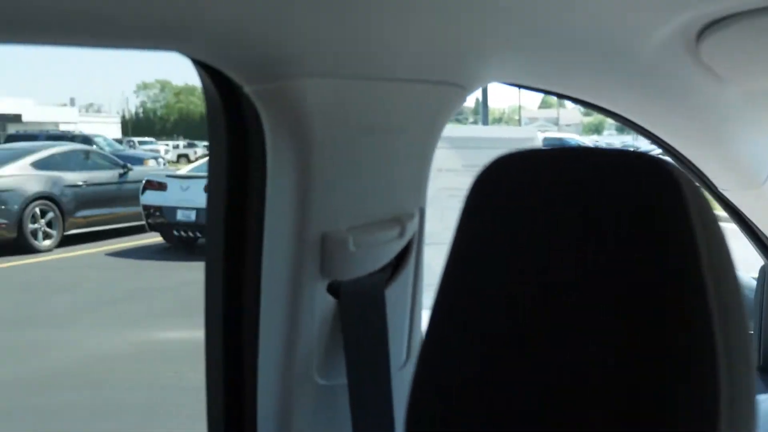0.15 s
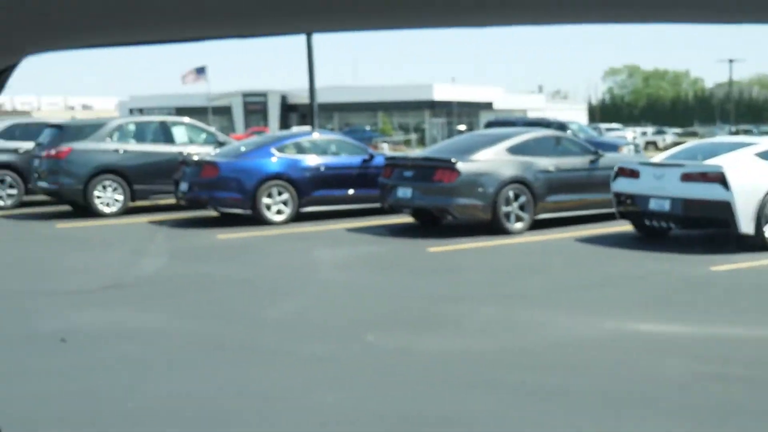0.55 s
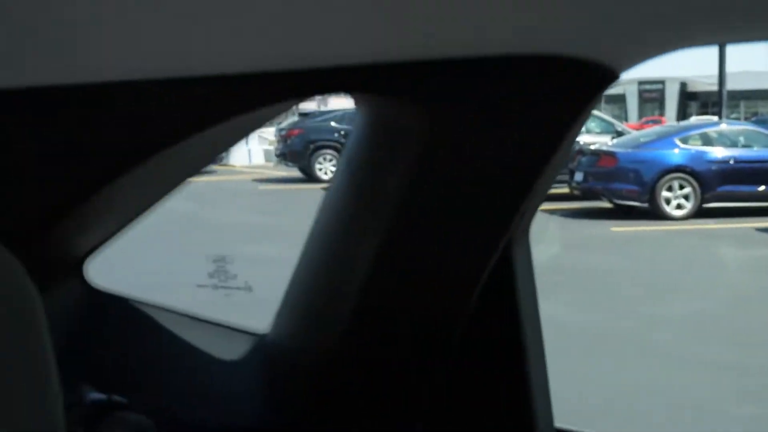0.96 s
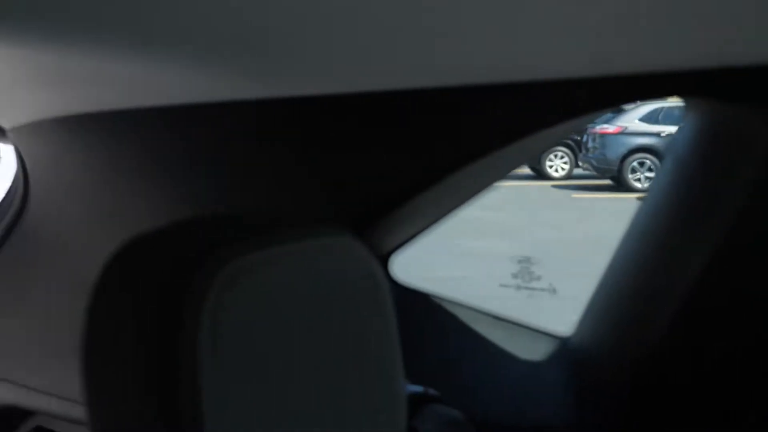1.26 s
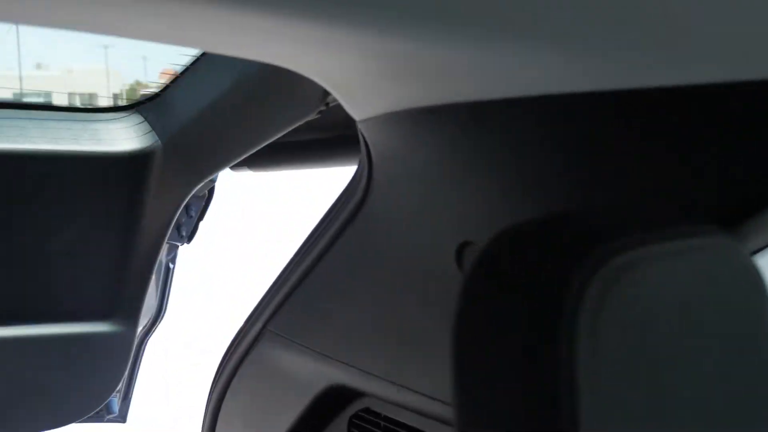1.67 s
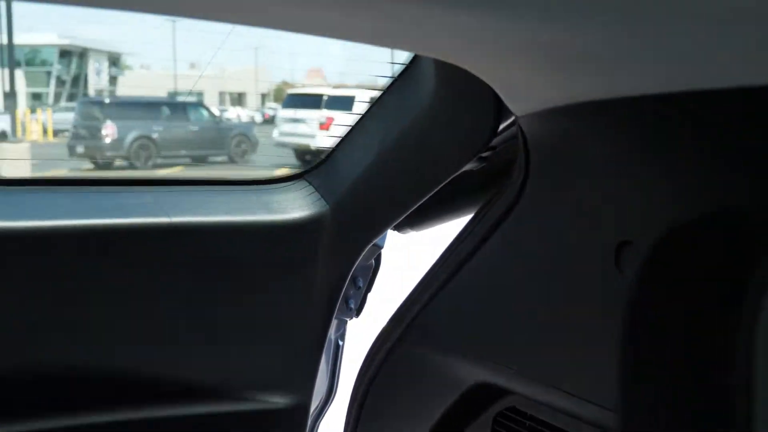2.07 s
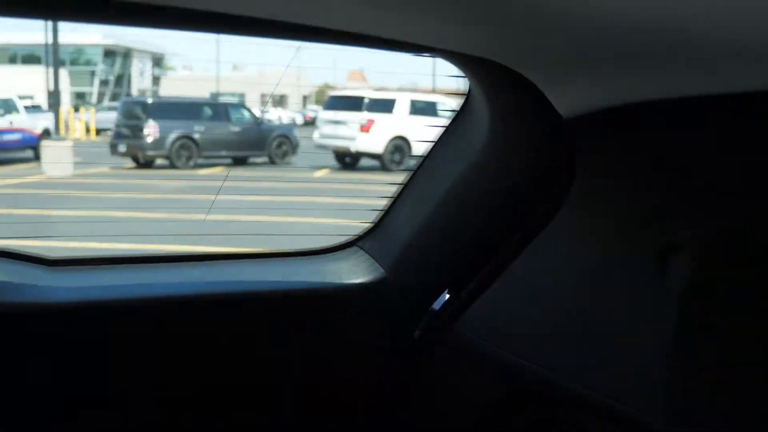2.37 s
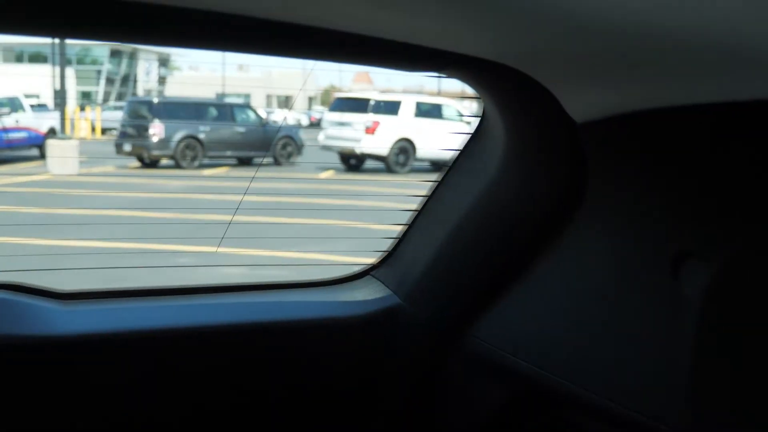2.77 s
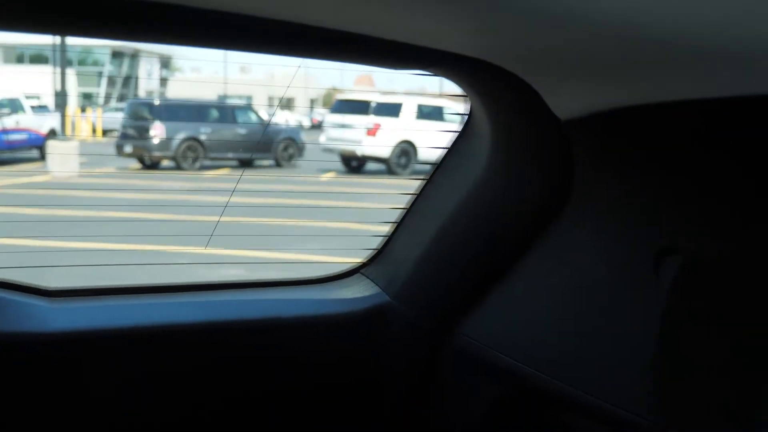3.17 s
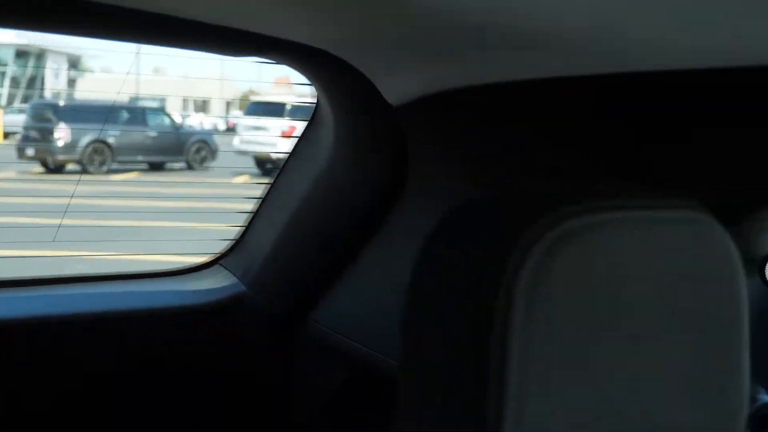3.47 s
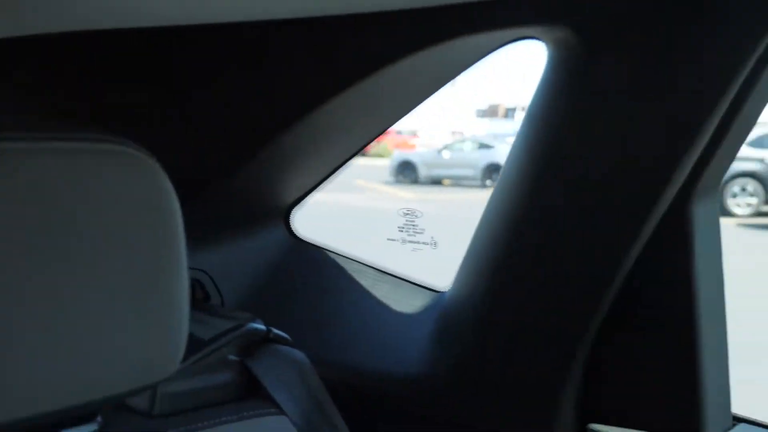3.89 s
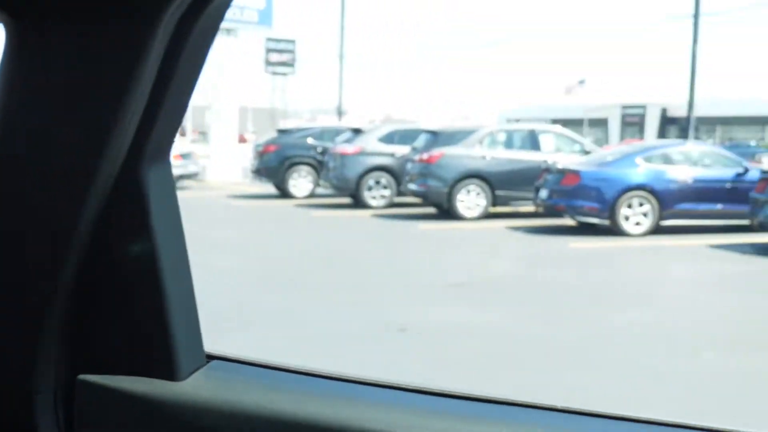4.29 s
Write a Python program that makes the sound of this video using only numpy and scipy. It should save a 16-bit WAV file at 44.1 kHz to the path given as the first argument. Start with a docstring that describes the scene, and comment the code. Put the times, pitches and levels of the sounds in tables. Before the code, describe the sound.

From inside a parked, idling car, a low engine throb and outdoor rumble sit under a wavering electric hum as the liftgate lowers. It shuts with a scraping crack and a huge, overloaded thump, dull knocks and boom following. The cabin goes quieter, a motor whines and rattles the latch tight, then stops, leaving a bright click and tiny trim ticks.

```python
"""Inside a parked, idling car a power liftgate hums down and shuts with a crack and a heavy thump.
The squeezed cabin air overloads the microphone; struck modes make the crack, knocks, thuds and clicks.
A motor tone and gear noise ring panels as the gate lowers; whining gears then cinch the rattling latch.
Engine orders throb under coloured noise for air, outdoors, rubber seal and upholstery.
The shut cabin is quieter, with one bright click and a few small ticks of trim."""
import sys
import numpy as np
from scipy import signal
from scipy.fft import rfft, irfft, next_fast_len
from scipy.io import wavfile
from scipy.ndimage import uniform_filter1d

SR = 44100
rng = np.random.default_rng(int(sys.argv[2]) if len(sys.argv) > 2 else 0)


def wav_out(sig):
    """Save sig, one row per channel (or a flat mono array), as 16-bit PCM at SR to the path in sys.argv[1]."""
    wavfile.write(sys.argv[1], SR, np.round(np.clip(np.atleast_2d(sig).T, -1, 1) * 32767).astype(np.int16))


N = 195848
T = np.arange(N) / SR
FREQS = np.maximum(np.fft.rfftfreq(next_fast_len(N, True), 1 / SR), 1)


def undb(db):
    """Amplitude gain is ten to the power of decibels over twenty."""
    return 10 ** (np.asarray(db) / 20)


def level(x, db):
    """Root-mean-square level: scale steady sound to it."""
    return x * undb(db) / np.sqrt(np.mean(x ** 2))


def burst_level(x, db):
    """Burst energy: scale a short sound to its rms level referred to 25 ms."""
    return x * undb(db) / np.sqrt(np.sum(x ** 2) / (SR / 40))


def walk(rate):
    """Low-passed noise: held random values, smoothed twice, wander with a spread near 1."""
    k = int(SR / rate)
    steps = rng.standard_normal(2000)[np.arange(N) // k]
    return 1.3 * uniform_filter1d(uniform_filter1d(steps, k), k)


def coloured(points):
    """Spectral shaping: white noise weighted through (Hz, dB) points on a log frequency axis."""
    hz, db = np.transpose(points)
    white = rfft(rng.standard_normal(next_fast_len(N, True)))
    return irfft(white * undb(np.interp(np.log(FREQS), np.log(hz), db)))[:N]


def ring(x, modes):
    """Modal superposition: sum of steep, twice-filtered resonances (Hz, width Hz, dB)."""
    out = 0
    for hz, width, db in modes:
        b, a = signal.iirpeak(min(hz, .45 * SR), hz / min(1.5 * width, SR / 4), fs=SR)
        once = signal.lfilter(b, a, x)
        out = out + undb(db) * signal.lfilter(b, a, once)
    return out


def muffle(x, hz):
    """Transmission loss: the treble above hz falls away, as through the trim."""
    return signal.sosfilt(signal.butter(2, min(hz, .45 * SR), fs=SR, output="sos"), x)


def contact(decay, tail_db, tail_t60):
    """Impact excitation: a gritty, decaying contact with dense, faint cabin reflections."""
    t = T[:SR // 5]
    envelope = np.exp(-t / decay) + undb(tail_db - 60 * t / tail_t60)
    force = rng.standard_normal(len(t)) * envelope
    force[0] += 0.29 * np.sqrt(np.sum(force ** 2))  # the first touch is a sharp tick
    return force


def add(out, s, x):
    """Linear superposition: mix x into out from time s."""
    i = int(s * SR)
    out[i:i + len(x)] += x[:N - i]


def spells(rows, attack, release):
    """Envelope: gain rises, holds and decays for each (start s, stop s, dB) row."""
    gain = 0
    for start, stop, db in rows:
        rise = np.clip((T - start) / attack, 0, 1)
        gain = gain + undb(db) * rise * np.exp(-np.maximum(T - stop, 0) / release)
    return gain


# The cinch loads the latch, holds it and lets go.
# Each row: time in seconds, tension from 0 to 1.
LATCH_TENSION = [(3.17, 0.02), (3.23, 1), (3.29, 1), (3.32, 0)]


def tension(s):
    """Static loading: the load on the latch at time s, interpolated between set points."""
    return np.interp(s, *np.transpose(LATCH_TENSION))


SHUT_S = 2.494
# Cabin air and body on its springs.
# Each row: frequency in Hz, relative level in dB, decay time t60 in seconds.
CABIN_MODES = [(6.03, 15, 0.393), (12.86, 1.5, 0.68), (31.95, -3.5, 0.61), (49.2, 1.5, .25)]


def squeeze(push_s=0.0044):
    """Damped oscillation: the gate squeezes the cabin air, which swings back and forth."""
    t = np.maximum(T - SHUT_S, 0)
    swing = sum(undb(db - 60 * t / t60) * np.sin(2 * np.pi * hz * t) for hz, db, t60 in CABIN_MODES)
    push = signal.windows.gaussian(SR // 16, push_s * SR)  # the soft seal spreads the blow
    return signal.fftconvolve(swing, push / push.sum(), "same")


MIC_LIMIT = 0.76  # pressure at which the microphone saturates


def overload(pressure):
    """Saturation: the microphone's gain falls once the pressure passes its limit."""
    return (1 + (pressure / MIC_LIMIT) ** 8) ** (-1 / 8)


# The gate jerks out against the latch and back, thudding in its panels.
# Each row: time in seconds, relative push in dB, rise in seconds, thud level in dB.
GATE_JOLTS = [(2.512, -6.3, .0021, -45.5), (2.549, -9, .007, -46), (2.6025, -26, .007, -48),
              (2.631, -25, .013, -60)]


def thump(pressure, low_cut_hz=10, jolt_top_hz=1000):
    """Clipped pressure wave: the swing passes the microphone's range; then the gate jerks."""
    pressure = muffle(pressure * overload(pressure), 900)
    for k, (s, db, rise, _) in enumerate(GATE_JOLTS):
        push = np.sin(np.pi / 2 * np.clip((T - s) / rise, 0, 1))
        pressure = pressure - (-1) ** k * undb(db) * muffle(push, jolt_top_hz)
    leak = signal.butter(1, low_cut_hz, "high", fs=SR)  # a held pressure drains away in the microphone
    return signal.lfilter(*leak, signal.lfilter(*leak, pressure))


# The striker scrapes harder from first touch until it seats; the scrape starts with a faint, growing lead.
STRIKE_TOUCH_S, STRIKE_SEAT_S, STRIKE_DB = 2.478, 2.496, -27.5
STRIKE_SWELL_DB_PER_S, STRIKE_FADE_DB_PER_S, STRIKE_LEAD_DB = 650, 10000, -14
# The gate skin under the striker's blow.
# Each row: frequency in Hz, width in Hz, relative level in dB.
GATE_SKIN = [(340, 300, 0), (600, 160, -12), (1030, 110, -13), (1250, 130, -10), (1550, 100, -17),
             (1950, 130, -9), (2580, 140, -13)]
# The striker trips the claw, then the pawl drops.
# Each row: time in seconds, level in dB, top frequency in Hz.
CLAW_CLACKS = [(2.4775, -49, 2400), (2.489, -43, 6000)]
# The claw. Each row: frequency in Hz, width in Hz, relative level in dB.
CLAW_MODES = [(1150, 300, -1), (1950, 300, 0), (2600, 300, -5), (5200, 500, -15), (5950, 500, -16)]


def strike(tilt_db=-3.5, metal_db=-12, skin_db=-.5, rebound_db=-44):
    """Friction and impact: the striker clacks, scrapes ever harder, and knocks as the gate jerks back."""
    early = STRIKE_SEAT_S - T
    drop_db = np.maximum(STRIKE_SWELL_DB_PER_S * early, -STRIKE_FADE_DB_PER_S * early)
    force_db = STRIKE_DB - drop_db + STRIKE_LEAD_DB * (T < STRIKE_TOUCH_S)
    modes = [(hz, width, db + tilt_db * max(np.log2(hz / 2000), 0))
             for hz, width, db in LATCH_MODES if hz > MODE_FAMILIES[0][1]]
    metal = muffle(ring(rng.standard_normal(N), modes), 3200)
    skin = ring(rng.standard_normal(N), GATE_SKIN)
    out = (level(metal, metal_db) + level(skin, skin_db)) * undb(force_db)
    knock_modes = [(470, 200, 1), (1200, 400, -12), (2400, 440, -28)]
    knock = ring(contact(0.0014, tail_db=-45, tail_t60=.03), knock_modes)
    add(out, GATE_JOLTS[0][0], burst_level(muffle(knock, 2000), rebound_db))
    for s, db, top_hz in CLAW_CLACKS:
        clack = ring(contact(.0022, tail_db=-50, tail_t60=.02), CLAW_MODES)
        add(out, s, burst_level(muffle(clack, top_hz), db))
    return out


# Gate panels. Each row: frequency in Hz, width in Hz, relative level in dB.
GATE_PANEL_MODES = [(118, 39, 1.5), (165, 50, -5), (330, 110, -16)]
# Further dull knocks of the same gate panels as the body shakes. Each row: time in seconds, level in dB.
PANEL_SHUDDERS = [(2.590, -42), (2.668, -52), (2.728, -55)]


def thuds():
    """Panel resonance: each jerk of the gate thuds dully, and the same panels knock again among them and after."""
    out = np.zeros(N)
    jolt_thuds = [(row[0], row[-1]) for row in GATE_JOLTS]
    for s, db in jolt_thuds + PANEL_SHUDDERS:
        thud = ring(contact(0.0047, tail_db=-22, tail_t60=0.091), GATE_PANEL_MODES)
        add(out, s, burst_level(muffle(thud, 600), db))
    return out


BOOM_S, BOOM_RISE_S = 2.603, .024
# Air modes of the sealed cabin. Each row: frequency in Hz, level in dB.
BOOM_MODES = [(49, -17.5), (68, -28), (105, -40)]


def boom():
    """Cavity modes: as the gate settles on its seal the cabin swells into a deep boom and dies away."""
    t = np.maximum(T - BOOM_S, 0)
    swell = t / BOOM_RISE_S * np.exp(1 - t / BOOM_RISE_S)
    return -swell * sum(undb(db) * np.sin(2 * np.pi * hz * t) for hz, db in BOOM_MODES)


# Latch and the gate around it. Each row: frequency in Hz, width in Hz, relative level in dB.
LATCH_MODES = [(300, 125, -2), (518, 58, -1), (775, 48, -2.5), (845, 50, 2), (978, 52, 2.5), (1120, 55, -5),
               (1245, 54, -6), (1735, 70, -11), (1925, 70, -.5), (2100, 80, -2), (2260, 110, 3),
               (2420, 90, -4), (2910, 90, -14), (3370, 100, -8), (4100, 160, -12), (5130, 180, -4),
               (5530, 140, -11), (5850, 180, -.5), (7040, 600, -22), (10000, 2000, -30)]
# Families of latch modes. Each row: lowest frequency in Hz, highest frequency in Hz.
MODE_FAMILIES = [(0, 650), (650, 920), (920, 1600), (1600, 3800), (3800, 20000)]
# How strongly each family answers a knock.
# Each row: response in dB with the latch slack, response in dB under full tension.
FAMILY_RESPONSE = [(-21, -24), (-0.5, 0), (-18, 5), (-17, -1.5), (-31.5, -16)]
# The latch knocks tight step by step; a harder contact tilts the sound upward.
# Each row: time in seconds, level in dB before tilt and response, tilt in dB per octave, decay in seconds.
LATCH_KNOCKS = [(3.046, -48, -5, .006), (3.082, -47, 0, 0.005), (3.119, -47, -1.5, .006),
                (3.170, -40, -6, .003), (3.198, -34, 1.63, 0.0028), (3.212, -37.5, -.7, .006),
                (3.234, -46, -9.5, .011), (3.260, -40.5, -10, .0025), (3.388, -42, -8, .003)]
KNOCK_PIVOT_HZ = 830
KNOCK_DETUNE = .01  # spread as a fraction: the latch shifts between knocks, and its modes with it
# The cinch lever drops back on its stop.
STOP_S, STOP_DB, STOP_DECAY_S = 3.324, -39.5, 0.0053
# Lever and stop. Each row: frequency in Hz, width in Hz, relative level in dB.
LEVER_MODES = [(307, 105, -9), (505, 55, 1), (760, 65, -2), (1140, 140, -22), (2300, 180, -31)]


def latch():
    """Stress-dependent modes: tension shifts the balance of each knock; then the lever drops back."""
    out = np.zeros(N)
    for s, db, tilt, decay in LATCH_KNOCKS:
        force = contact(decay, tail_db=-22, tail_t60=.1)
        for (lo, hi), (slack_db, tense_db) in zip(MODE_FAMILIES, FAMILY_RESPONSE):
            modes = [(hz * (1 + KNOCK_DETUNE * rng.standard_normal()), width, mode_db)
                     for hz, width, mode_db in LATCH_MODES if lo <= hz < hi]
            octaves = np.mean([np.log2(mode[0] / KNOCK_PIVOT_HZ) for mode in modes])
            response_db = slack_db + (tense_db - slack_db) * tension(s)
            knock = muffle(ring(force, modes), 2 * hi)
            add(out, s, burst_level(knock, db + tilt * octaves + response_db))
    lever = ring(contact(STOP_DECAY_S, tail_db=-17, tail_t60=0.11), LEVER_MODES)
    add(out, STOP_S, burst_level(muffle(lever, 2100), STOP_DB))
    return out


# The pawl clicks over its teeth. Each row: time in seconds, level in dB, decay in seconds.
TOOTH_CLICKS = [(3.054, -77, .003), (3.121, -75, .003), (3.167, -69.5, .0015), (3.367, -63.5, .005),
                (3.386, -70, .004)]
# The pawl. Each row: frequency in Hz, width in Hz, relative level in dB.
PAWL_MODES = [(2220, 160, 4), (3000, 300, -5), (4200, 500, -10), (5615, 260, -3), (5975, 260, -2),
              (6508, 300, -4), (8000, 1500, -19), (10410, 500, -15)]


def pawl():
    """Ratchet impacts: short, bright clicks of the pawl among the knocks."""
    out = np.zeros(N)
    for s, db, decay in TOOTH_CLICKS:
        add(out, s, burst_level(ring(contact(decay, tail_db=-22, tail_t60=.05), PAWL_MODES), db))
    return out


MOTOR_HZ = 321
MOTOR_ATTACK_S, MOTOR_RELEASE_S, MOTOR_WANDER_DB = 0.049, .07, .6
CINCH_ATTACK_S, CINCH_RELEASE_S = 0.028, 0.028
STALL_DB = -16  # the drive all but stalls under full tension
# The motor lowers the gate, runs on lightly, then cinches the latch.
# Each row: start in seconds, stop in seconds, level in dB before uneven loudness and stall.
MOTOR_RUNS = [(.275, 2.5, -57), (2.65, 2.86, -65), (2.88, 3.42, -59.5)]
# Uneven loudness of the motor hum. Each row: time in seconds, relative level in dB.
MOTOR_LOUDNESS = [(.3, 0), (.8, -1), (.92, 2.5), (1.2, -.5), (1.31, 4.5), (1.45, -2.5), (1.8, 2),
                  (2.2, -1.5), (2.45, 0)]
# Panels that the drive shakes. Each row: frequency in Hz, width in Hz, relative level in dB.
DRIVE_PANELS = [(280.7, 53, 1.5), (323.6, 50, 1.5), (376.4, 45, -6), (624, 90, -23), (766, 55, -8.5),
                (1060, 69, -23.5), (1300, 100, -25)]
# The cinch gears grind. Each row: start in seconds, stop in seconds, level in dB before stall.
CINCH_RUNS = [(3.02, 3.385, -52)]
# The housing that they shake. Each row: frequency in Hz, width in Hz, relative level in dB.
GEAR_HOUSING = [(215, 90, 3), (330, 90, -1), (500, 76, -9), (850, 70, -9)]


def motor():
    """Forced vibration: tone and panel noise follow an uneven loudness; cinch gears join, all stall."""
    phase = 2 * np.pi * np.cumsum(MOTOR_HZ * (1 + 0.0058 * walk(14))) / SR
    tone = level(np.sin(phase) * undb(1.8 * walk(18)), -4)
    gears = level(ring(rng.standard_normal(N), DRIVE_PANELS) * undb(1.2 * walk(12)), -3.5)
    loudness_db = np.interp(T, *np.transpose(MOTOR_LOUDNESS)) + MOTOR_WANDER_DB * walk(4)
    drive = (tone + gears) * undb(loudness_db) * spells(MOTOR_RUNS, MOTOR_ATTACK_S, MOTOR_RELEASE_S)
    grind = level(ring(rng.standard_normal(N), GEAR_HOUSING), 0)
    cinch = grind * spells(CINCH_RUNS, CINCH_ATTACK_S, CINCH_RELEASE_S)
    return (drive + cinch) * undb(STALL_DB * tension(T))


# Whine of the cinch gears.
# Each row: time in seconds, frequency in Hz, level in dB above their grinding before it stalls.
GEAR_WHINE = [(3.04, 830, -7), (3.1, 790, -4), (3.16, 875, 1), (3.22, 940, 4), (3.265, 1020, 4),
              (3.29, 900, -11), (3.39, 860, -9)]
WHINE_JITTER, WHINE_ROUGH_DB = .04, 5  # pitch spread as a fraction, level spread in dB


def cinch_whine():
    """Gear-mesh tone: a rough whine climbs and swells as the latch pulls tight, then sinks."""
    times, hz_points, db_points = np.transpose(GEAR_WHINE)
    hz = np.interp(T, times, hz_points)
    db = np.interp(T, times, db_points)
    phase = 2 * np.pi * np.cumsum(hz * (1 + WHINE_JITTER * walk(80))) / SR
    tone = level(np.sin(phase) * undb(WHINE_ROUGH_DB * walk(140)), 0)
    return tone * undb(db) * spells(CINCH_RUNS, CINCH_ATTACK_S, CINCH_RELEASE_S)


# The seal rubs as the gate is drawn in and let go. Each row: time in seconds, level in dB.
SEAL_RUB = [(2.92, -90), (3.05, -78), (3.16, -78), (3.215, -68), (3.25, -76), (3.355, -82), (3.385, -73),
            (3.41, -82), (3.55, -90)]
# Its hiss. Each row: frequency in Hz, relative density in dB per Hz.
SEAL_SPECTRUM = [(1000, -22), (2400, 1.5), (4000, -3), (6200, 0.5), (8000, -8), (11000, -14), (14000, -28)]


def seal():
    """Sliding friction: rubber creeps over paint with a fluttering hiss that swells and sinks."""
    hiss = level(coloured(SEAL_SPECTRUM) * undb(3.5 * walk(150)), 0)
    return hiss * undb(np.interp(T, *np.transpose(SEAL_RUB), left=-np.inf, right=-np.inf))


# A small hard part clicking. Each row: frequency in Hz, width in Hz, relative level in dB.
CLICK_MODES = [(4270, 160, 0), (4540, 230, -6), (5230, 250, -3), (5480, 200, 0), (6080, 91, -9),
               (7100, 140, -4), (7970, 120, -13), (9500, 200, -24), (10500, 410, -26), (14650, 200, -27)]
# Ticks of trim. Each row: time in seconds, level in dB, frequency in Hz, width in Hz.
TRIM_TICKS = [(.201, -76, 5200, 3000), (.206, -68, 1450, 400), (4.009, -79, 5500, 4000),
              (4.040, -79, 5500, 3000), (4.120, -65, 2000, 3000), (4.120, -69, 6500, 3000),
              (4.208, -58, 1450, 280), (4.209, -71, 4300, 1000), (4.246, -73, 4300, 1200),
              (4.287, -70, 5950, 1100), (4.402, -75, 5600, 800)]
TICK_DECAY_S = .0026
# Soft rubs. Each row: time in seconds, level in dB, frequency in Hz, width in Hz, length in seconds.
SOFT_RUBS = [(0.111, -58.5, 773, 100, .11), (.14, -63, 1200, 600, 0.13), (.19, -72, 3000, 3500, .05),
             (.36, -61, 757, 120, 0.11), (.82, -60.5, 1046, 89.5, .16), (1.72, -78, 6000, 4000, 0.12),
             (2.405, -50, 270, 260, .085)]


def clicks(click_s=4.1455, click_db=-42, chatter_s=.007, chatter_db=-12, crack_db=-22):
    """Small-body radiation: one bright ringing click, small ticks and faint rubs."""
    out, t = np.zeros(N), T[:SR // 5]
    force = contact(0.0012, tail_db=-21, tail_t60=0.085)
    chatter = contact(0.0042, tail_db=-22, tail_t60=.04)[:SR // 10]
    add(force, chatter_s, undb(chatter_db) * chatter)  # the part chatters as it settles
    click = ring(force, CLICK_MODES) + undb(crack_db) * muffle(force, 6000)
    low_cut = signal.butter(2, 3500, "high", fs=SR, output="sos")  # too small to radiate lows
    add(out, click_s, burst_level(signal.sosfilt(low_cut, click), click_db))
    for s, db, hz, width in TRIM_TICKS:
        tick = ring(contact(TICK_DECAY_S, tail_db=-14, tail_t60=0.1), [(hz, width, 0)])
        add(out, s, burst_level(tick, db))
    for s, db, hz, width, length in SOFT_RUBS:
        swell = np.sin(np.pi * np.minimum(t / length, 1))
        rub = ring(swell * rng.standard_normal(len(t)), [(hz, width, 0)])
        add(out, s, burst_level(rub, db))
    return out


# Engine lines; the open cabin resonates with the lowest orders like a bottle.
# Each row: multiple of the cycle rate, level in dB with the gate open, level in dB with it shut.
ENGINE_ORDERS = [(2, -42, -59.5), (3, -28.5, -40.5), (4, -46, -48), (6, -44, -65), (9, -66, -64),
                 (12, -61.5, -64.5)]
CYCLE_HZ = 7.92


def engine(gate_open):
    """Harmonic series: idle orders of one unsteady cycle, their levels set by how open the gate is."""
    turns = np.cumsum(CYCLE_HZ * (1 + .002 * walk(2.93))) / SR
    out = 0
    for order, open_db, shut_db in ENGINE_ORDERS:
        db = shut_db + (open_db - shut_db) * gate_open + .8 * walk(4.3)
        out = out + np.sqrt(2) * undb(db) * np.sin(2 * np.pi * (round(order) * turns + rng.random()))
    return out


# Steady air in the cabin. Each row: frequency in Hz, relative density in dB per Hz.
CABIN_AIR = [(24, -34.5), (40, -2), (54, -24.5), (91, -15.5), (135, -17.5), (153, -31.5), (196, -30),
             (263, -34), (321, -26.5), (454, -35.5), (643, -33), (728, -38), (1170, -40.5), (3740, -63.5),
             (11000, -68), (15000, -75)]
AIR_DB = -49.5
# What comes in through the open gate. Each row: frequency in Hz, relative density in dB per Hz.
OUTSIDE_AIR = [(10, -8.5), (18, 1.5), (30, -7.5), (60, -2), (100, -20), (180, -36), (700, -36), (2000, -59),
               (6000, -69.5), (14000, -100)]
# Upholstery rustles. Each row: start in seconds, stop in seconds, level in dB.
RUSTLE_SPELLS = [(3.0, 3.42, -70), (3.98, 4.08, -74), (4.19, 4.44, -67)]
RUSTLE_ATTACK_S, RUSTLE_RELEASE_S = .06, 0.12


def air(gate_open):
    """Broadband noise: cabin air, the outdoors until the gate shuts, and soft rustling."""
    cabin = level(coloured(CABIN_AIR) * undb(.5 * walk(4.5)), AIR_DB)
    outside = level(coloured(OUTSIDE_AIR) * undb(1.7 * walk(3.4)), -46) * gate_open
    rustle = coloured([(300, -18), (900, -0.5), (1900, 1.0), (2400, -14), (3300, -20), (5000, -17),
                       (8000, -25), (14000, -33.0)])
    rustle = level(rustle * undb(1.8 * walk(30)), 0)
    return cabin + outside + rustle * spells(RUSTLE_SPELLS, RUSTLE_ATTACK_S, RUSTLE_RELEASE_S)


def scene():
    """Superposition and masking: all sources add; the overload briefly smothers the steady ones."""
    gate_open = np.clip((2.62 - T) / 0.11, 0, 1)
    pressure = squeeze()
    steady = (engine(gate_open) + air(gate_open) + motor()) * np.maximum(overload(pressure), .4)
    shut = undb(1.2) * thump(pressure) + boom() + thuds() + strike()
    return (steady + shut + latch() + pawl() + cinch_whine() + seal() + clicks())[None]


TOP_HZ = 15300


def record(dry):
    """Band limiting: a steep elliptic low-pass in the recorder cuts the top."""
    return signal.sosfilt(signal.ellip(8, .2, 70, TOP_HZ, fs=SR, output="sos"), dry)


dry = scene()
out = record(dry)
wav_out(out)
```